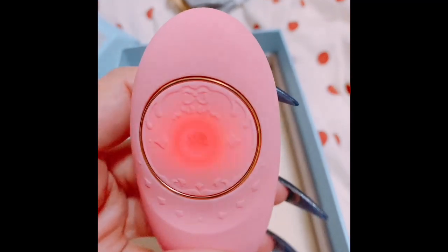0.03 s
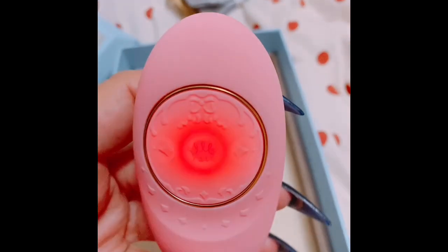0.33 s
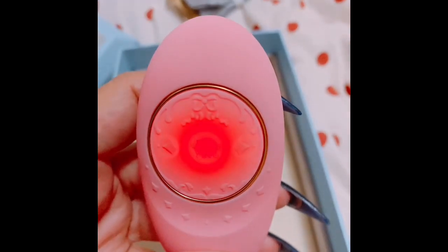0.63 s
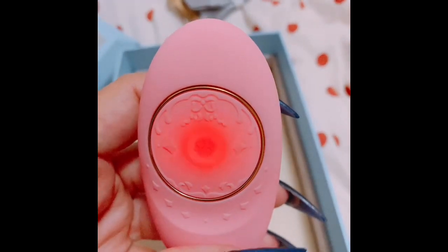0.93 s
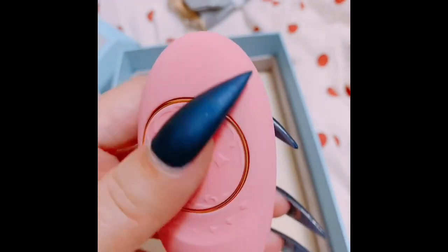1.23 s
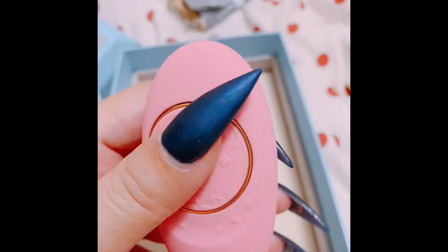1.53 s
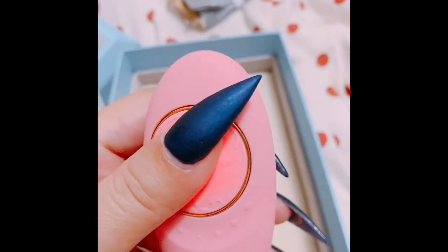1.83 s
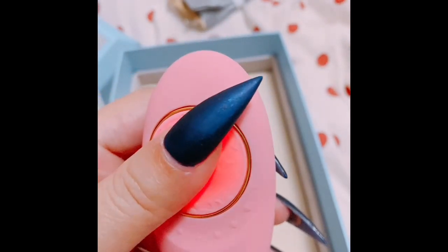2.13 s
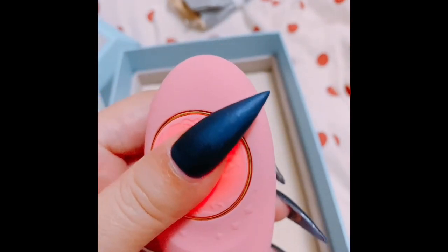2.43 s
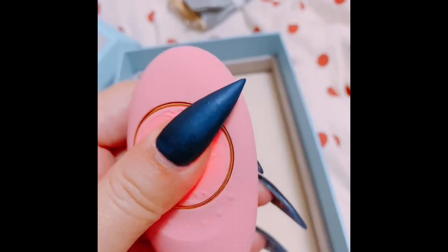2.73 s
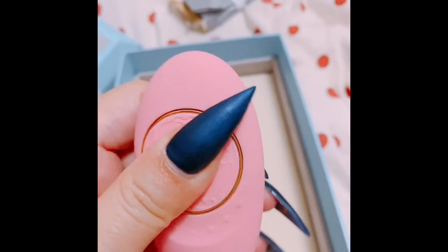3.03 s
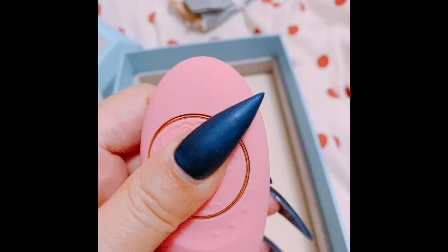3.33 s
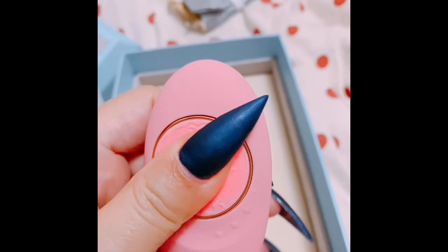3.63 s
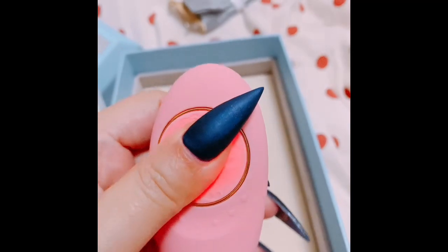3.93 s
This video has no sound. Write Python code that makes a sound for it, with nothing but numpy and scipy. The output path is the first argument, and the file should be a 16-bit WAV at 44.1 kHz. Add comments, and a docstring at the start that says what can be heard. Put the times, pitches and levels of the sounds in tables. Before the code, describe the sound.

A small handheld massager buzzes close by throughout, a low hum with a thin, high rattle and whine above it. From about 1 second the hum slowly grows and a light plastic buzz joins as a thumb presses down. At about 2.5 seconds the button clicks once, with a faint rub of skin. The motor runs on until 4 seconds, sinking slightly in pitch, in a quiet room.

```python
"""A small handheld vibrating massager thrums close by in a quiet room, driven by an off-centre weight.
Its brushes tick and spark six times a turn, and its loose shaft knocks in the plastic shell twice a turn.
A thumb settles on the button: it loads the motor, damps the shell's brightest ringing and wakes
a lower buzz. The button clicks once, and the skin rubs softly on it."""
import sys
import numpy as np
from scipy import signal
from scipy.fft import rfft, irfft
from scipy.io import wavfile

SR = 44100
rng = np.random.default_rng(int(sys.argv[2]) if len(sys.argv) > 2 else 0)


def to_wav(s):
    """Save 16-bit WAV."""
    ch = np.atleast_2d(s).T  # columns
    pcm = np.round(np.clip(ch, -1, 1) * 32767)  # PCM
    wavfile.write(sys.argv[1], SR, pcm.astype(np.int16))


N = 176400
T = np.arange(N) / SR

# Rotation rate of the shaft: t/s, f/Hz
SHAFT_RATE = [(0, 56.25), (.38, 56.9), (.51, 56.33), (.87, 56.62), (.98, 58.1), (1.11, 57.3), (1.26, 57.67),
              (1.75, 56.93), (2.34, 56.45), (2.56, 57.55), (2.67, 56.8), (2.81, 57.2), (2.99, 55.45),
              (3.25, 54.75), (3.62, 54), (3.8, 54.27), (4, 52.5)]
# Fundamental of the thrum: t/s, level/dB
THRUM_LEVEL = [(0.03, -45), (0.06, -42), (0.81, -43), (1.28, -41), (1.57, -39.5), (2.47, -38.5),
               (2.59, -36), (3.96, -38.5)]
# Its second harmonic: t/s, level/dB re OCTAVE_DB
OCTAVE_LEVEL = [(0.1, -58.5), (0.16, -76), (1.41, -60.5), (1.43, -64), (2.31, -62.5), (2.35, -75),
                (2.93, -61.5), (3.6, -71), (3.67, -57.5), (3.95, -59)]
# Higher harmonics re the fundamental: harmonic number, loose level/dB, pressed level/dB
HARMONICS = [(3, -24, -42.5), (4, -35, -43.5), (5, -30, -51), (6, -37.5, -50.5), (9, -37, -43.5),
             (15, -39, -46.5), (17, -42, -43)]
# Pressure of the thumb: t/s, weight (0 loose, 1 pressed)
THUMB_WEIGHT = [(0, 0), (.95, 0.02), (1.25, 0.36), (2.3, 0.5), (2.55, 0.75), (2.75, 0.57), (2.95, 0.85),
                (3.3, 0.82), (3.5, 0.58), (3.7, 0.77), (4, 0.8)]
# Relative response of the shell to a brush tick: f/Hz, loose level/dB, pressed level/dB
BRUSH_RESPONSE = [(507, -30.5, -31.5), (920, -17, -13.5), (1190, -22, -22.5), (1555, -16, -15.5),
                  (1880, -24, -12.5), (2550, -16, -8.5), (3200, -13, -6.5), (3510, -4, -9.5),
                  (3900, 2.5, 2.5), (4200, -8.5, -9.5), (4700, -10, -24), (5000, -17.5, -25),
                  (6400, -38, -34), (15500, -36.5, -37)]
# Relative spectrum of the sparks: f/Hz, level/dB
SPARK_SPECTRUM = [(2000, -36), (5000, -11.5), (6300, -0.5), (7500, -2.5), (9300, 0.5), (10500, -9),
                  (12000, -19), (14500, -6), (15800, -18)]
# The shaft's impact and its ever looser rebounds: lag/turns, relative level/dB, timing scatter/s
SHAFT_IMPACTS = [(0, 0, 6e-6), (.16, -5, 9e-6), (.3, -10, 18e-6)]
# Relative response of the shell to a knock: f/Hz, loose level/dB, pressed level/dB
KNOCK_RESPONSE = [(600, -27, -24), (1250, -26.5, -28), (1690, -14, -21), (2380, -19, -26), (3050, -34, -24),
                  (3580, -18.5, -18.5), (3920, -6.5, -2), (4204, 4.5, 4), (4726, -4, -7), (5000, -9, -13),
                  (5470, -10.5, -21), (6050, -15.5, -28), (6540, -32, -27), (9300, -29, -29),
                  (12500, -23, -37), (15600, -30.5, -26)]
# Relative spectral density of brush friction: f/Hz, level/dB
RUB_SPECTRUM = [(800, -20.5), (3100, -15.5), (3800, -2), (4200, 8), (4600, -0.5), (5200, -5), (6300, -31),
                (9300, -19), (12000, -46), (15500, -31)]
# Gain shared by the knocks and the brush friction: t/s, gain/dB
TREBLE_GAIN = [(0, 0), (.85, 0.8), (.98, 2), (1.25, -1), (2.1, -0.6), (2.45, 1.9), (2.75, 0.1), (3.4, 1.3),
               (3.75, -1), (4, -3.5)]
# The motor's tap on the pressed shell and its rebound: lag/turns, relative level/dB
SHELL_TAPS = [(.17, 1.5), (.344, -10.5)]
# Relative spectrum of the shell's buzz: f/Hz, level/dB
BUZZ_SPECTRUM = [(1200, -30), (1950, -25), (2180, -1.5), (2300, -1), (2380, -8), (2560, 2), (2670, 5.5),
                 (2780, -3.5), (2900, -19.5), (4600, -22), (5200, -29), (14000, -29)]
# Strength of that buzz: t/s, level/dB
BUZZ_ENVELOPE = [(0, -81), (1, -81), (1.25, -75), (1.7, -73), (2.35, -75), (2.45, -69), (2.57, -71.5),
                 (2.68, -65), (2.88, -66), (2.99, -68.5), (3.3, -64), (3.5, -65.5), (3.62, -69), (4, -69)]
# Snap of the button's dome and its rebounds: delay/s, relative level/dB
DOME_SNAPS = [(0, -3.5), (.0016, -33), (0.0149, -30)]
# Modes of button and shell: f/Hz, relative level/dB
BUTTON_MODES = [(450, -30), (1200, -20), (2400, -16), (3050, -23), (4600, -22.5), (5050, -12),
                (5450, -12.5), (5900, -17.5), (7500, -17.5), (8900, -15.5), (10650, -14), (11300, -17),
                (13000, -27)]
# Relative spectral density of skin friction: f/Hz, level/dB
SKIN_SPECTRUM = [(150, -10), (350, -5), (700, 5.5), (1100, -10), (3000, -24), (6000, -34), (8700, -4.5),
                 (11000, -23), (15000, -33)]
# Relative spectral density of room and handling noise: f/Hz, level/dB
ROOM_SPECTRUM = [(20, -12), (45, 2), (90, 4.5), (150, -6), (250, -4.5), (400, -10), (650, -14.5),
                 (1100, -18), (2000, -18), (3200, -19), (6300, -23), (9500, -21), (12000, -25),
                 (15500, -41)]

OCTAVE_DB = -4
SEGMENT_DB = [1.6, 2.2, 2.5]  # the three commutator segments differ
SPARK_SIDE_DB = [-0.5, -3.5]  # one brush sparks more than the other


def thrum(turns, thumb):
    """Rotating unbalance forces the body at the shaft rate; the thumb damps the higher harmonics."""
    angle = 2 * np.pi * turns
    wave = np.cos(angle)
    for k, loose_db, pressed_db in HARMONICS:
        gain = amp(loose_db + (pressed_db - loose_db) * thumb)
        wave += gain * np.cos(round(k) * angle + 2 * np.pi * rng.random())
    octave = amp(OCTAVE_DB + curve(OCTAVE_LEVEL)) * np.sin(2 * angle)
    return np.sqrt(2) * (amp(curve(THRUM_LEVEL)) * wave + octave)


def shaft_knocks(turns, thumb):
    """Impacts across a clearance: the shaft strikes the shell twice a turn and rebounds."""
    blows = sum(amp(db) * impulses(turns - lag, [0], rough=.06, per_turn=2, scatter_s=scatter, late_s=48e-6)
                for lag, db, scatter in SHAFT_IMPACTS)
    return amp(-61) * shell(blows, thumb, KNOCK_RESPONSE)


def brush_whine(turns, thumb):
    """Periodic excitation: brush ticks on the commutator fuse into a whine in the shell."""
    ticks = impulses(turns, SEGMENT_DB, rough=.06, per_turn=6)
    return amp(-64) * shell(ticks, thumb, BRUSH_RESPONSE)


def sparks(turns):
    """Arcing at the commutator radiates six bright, uneven pulses a turn."""
    arcs = impulses(turns, SPARK_SIDE_DB, rough=.13, per_turn=6)
    return amp(-72) * colour(arcs, SPARK_SPECTRUM)


def shell_buzz(turns):
    """Contact chatter: the motor taps the pressed shell, which resonates near 2.6 kHz."""
    taps = sum(amp(db) * impulses(turns - lag, [2, -1.5], rough=.11, per_turn=2) for lag, db in SHELL_TAPS)
    return amp(curve(BUZZ_ENVELOPE)) * colour(taps, BUZZ_SPECTRUM)


def brush_friction(turns, steady=.3, decay_turns=.14):
    """Sliding friction of the brushes makes noise that surges every half turn."""
    surge = steady + np.exp(-(turns % .5) / decay_turns)
    return amp(-74) * colour(rng.standard_normal(N) * surge, RUB_SPECTRUM)


def button_click(at_s=2.5136, rise_s=.00023, ring_t60_s=.0045, room_t60_s=.14):
    """Snap-through of the dome excites briefly ringing modes; the room reverberates faintly."""
    click = np.zeros(N)
    for delay, db in DOME_SNAPS:
        age = np.clip(T - at_s - delay, 0, .5)
        modes = sum(amp(level) * np.sin(2 * np.pi * hz * age) for hz, level in BUTTON_MODES)
        attack = 1 - np.exp(-(age / rise_s) ** 2)
        decay = amp(-60 * np.minimum(age / ring_t60_s, 10))
        click += amp(db - 6.5) * attack * decay * modes
    t = T[:SR // 2]
    tail = rng.standard_normal(len(t)) * amp(-60 * t / room_t60_s)
    return click + amp(-21) * signal.oaconvolve(click, tail / np.linalg.norm(tail))[:N]


def skin_friction(peak_s=2.7, width_s=.35):
    """Friction of the thumb on the button gives one soft swell of noise."""
    swell = np.exp(-((T - peak_s) / width_s) ** 2)
    return amp(-71.5) * swell * colour(rng.standard_normal(N), SKIN_SPECTRUM)


def room():
    """Stationary noise, strongest at low frequencies, forms the dull background."""
    return amp(-61.5) * colour(rng.standard_normal(N), ROOM_SPECTRUM)


def shell(force, thumb, response):
    """Resonance near 4 kHz; the thumb's weight blends the loose response into the pressed one."""
    hz, loose_db, pressed_db = np.transpose(response)
    return (1 - thumb) * colour(force, np.c_[hz, loose_db]) + thumb * colour(force, np.c_[hz, pressed_db])


def impulses(turns, pattern_db, rough, per_turn, scatter_s=5e-6, late_s=0):
    """Alternating pushes and pulls, scattered in strength and time; each pull lags by late_s."""
    k = np.arange(1, int(turns[-1] * per_turn))
    size_noise, time_noise = rng.standard_normal((len(k), 2)).T
    centre = (np.interp(k / per_turn, turns, T) + scatter_s * time_noise + late_s * (k % 2)) * SR
    size = (-1.) ** k * amp(pattern_db)[k % len(pattern_db)] * (1 + rough * size_noise)
    near = centre.astype(int)[:, None] + np.arange(-8, 9)
    offset = near - centre[:, None]
    pulses = size[:, None] * np.sinc(offset) * np.sinc(offset / 9)  # band-limited, between samples
    return np.bincount(np.clip(near, 0, N - 1).ravel(), pulses.ravel(), N)


def colour(x, spectrum):
    """Minimum-phase filtering by an outline (f/Hz, level/dB); the result has rms 1."""
    hz, db = np.transpose(spectrum)
    log_hz = np.log(abs(np.fft.fftfreq(4096, 1 / SR)) + 1)
    log_gain = np.log(amp(np.interp(log_hz, np.log(hz), db)))
    ring = np.fft.ifft(np.exp(np.conj(signal.hilbert(log_gain)))).real
    return unit(signal.oaconvolve(x, ring[:len(ring) // 2])[:N])


def drift(cutoff_hz):
    """Low-passed noise: slow random motion of rms 1."""
    rolloff = 1 + (np.fft.rfftfreq(N, 1 / SR) / cutoff_hz) ** 4
    return unit(irfft(rfft(rng.standard_normal(N)) / rolloff, N))


def curve(rows):
    """Linear interpolation of rows (t/s, value)."""
    return np.interp(T, *np.transpose(rows))


def amp(db):
    """Amplitude ratio of a level in decibels."""
    return 10 ** (np.asarray(db) / 20)


def unit(x):
    """Normalisation to rms 1."""
    return x / np.sqrt(np.mean(x ** 2) + 1e-20)


def scene():
    """Superposition: the motor's sounds, all locked to one shaft, add to button, skin and room."""
    rate_hz = curve(SHAFT_RATE) * (1 + .0007 * drift(cutoff_hz=25))
    turns = np.cumsum(rate_hz) / SR
    lagged = turns - .14  # knocks and brushes trail the weight's swing
    thumb = np.clip(curve(THUMB_WEIGHT), 0, 1)
    motor = thrum(turns, thumb) + brush_whine(lagged, thumb) + sparks(lagged)
    motor += amp(curve(TREBLE_GAIN)) * (shaft_knocks(lagged, thumb) + brush_friction(lagged))
    motor += shell_buzz(turns)
    return (motor + button_click() + skin_friction() + room())[None]


def record(dry):
    """Band limiting: a linear-phase low-pass filter cuts off at 15.8 kHz."""
    lowpass = signal.firwin(511, 15800, window=("kaiser", 9), fs=SR)
    return signal.oaconvolve(dry, lowpass[None], "same")


dry = scene()
out = record(dry)
to_wav(out)
```